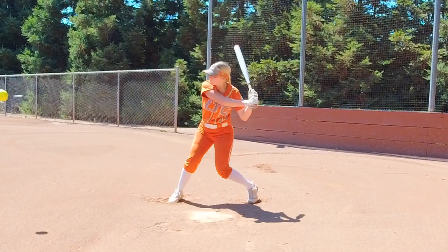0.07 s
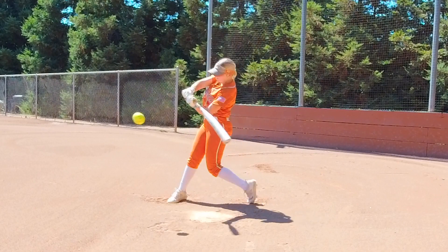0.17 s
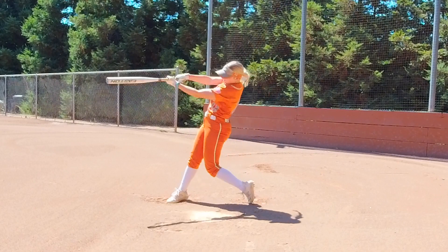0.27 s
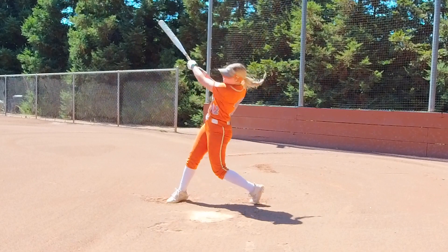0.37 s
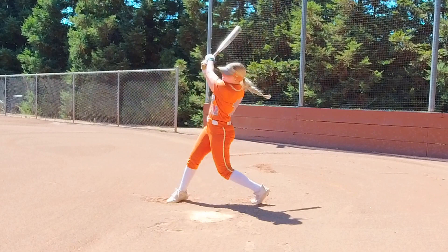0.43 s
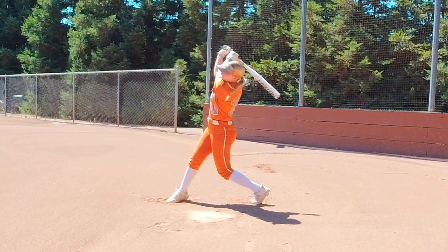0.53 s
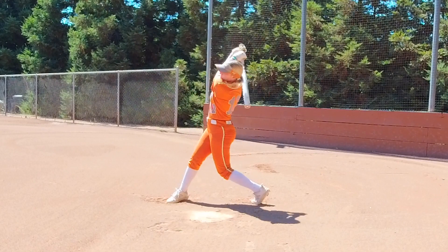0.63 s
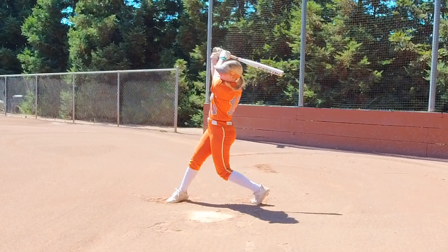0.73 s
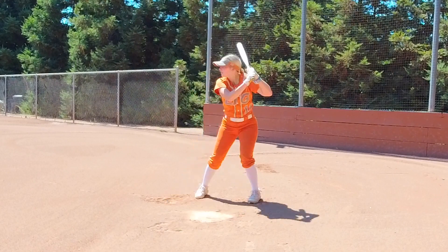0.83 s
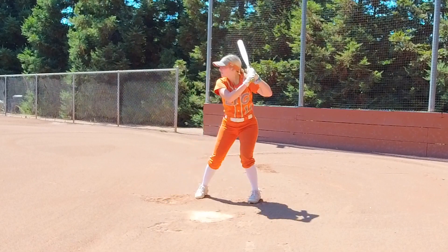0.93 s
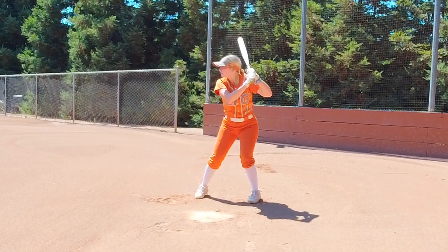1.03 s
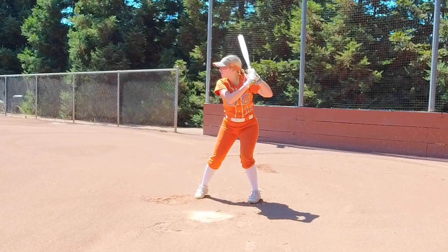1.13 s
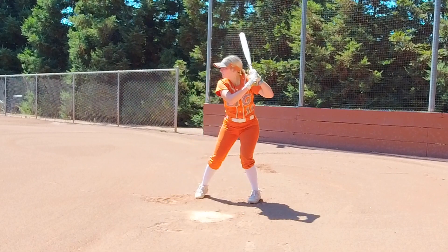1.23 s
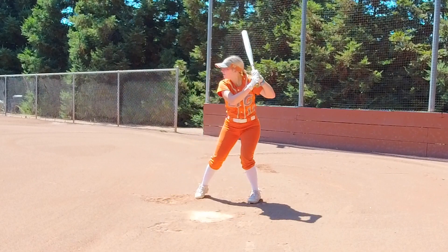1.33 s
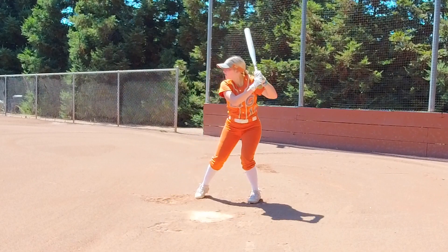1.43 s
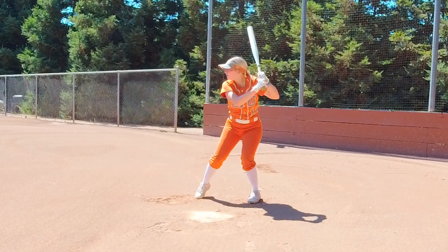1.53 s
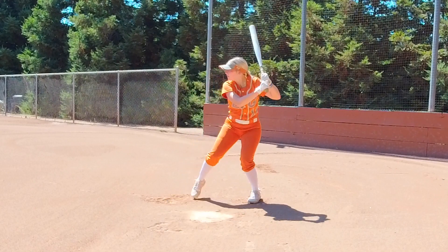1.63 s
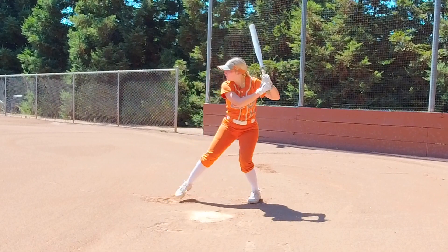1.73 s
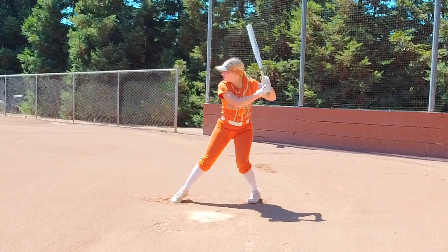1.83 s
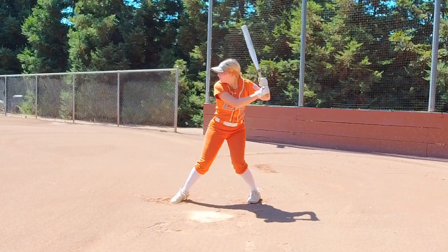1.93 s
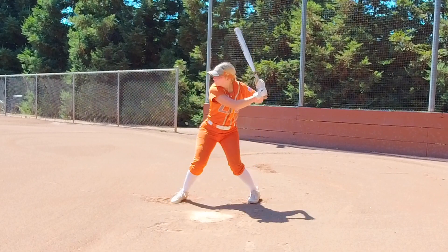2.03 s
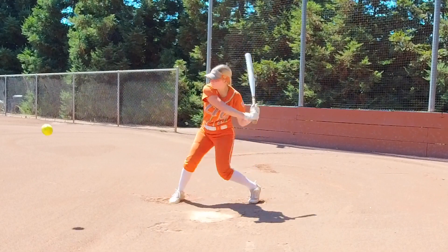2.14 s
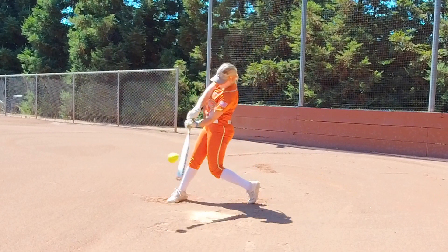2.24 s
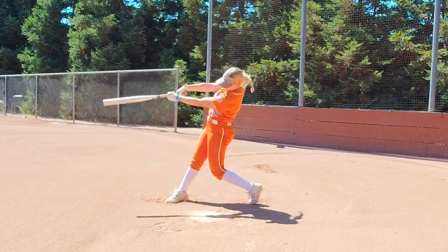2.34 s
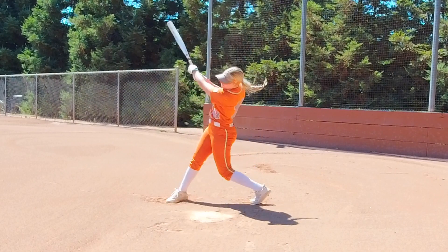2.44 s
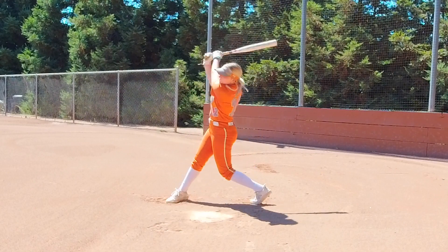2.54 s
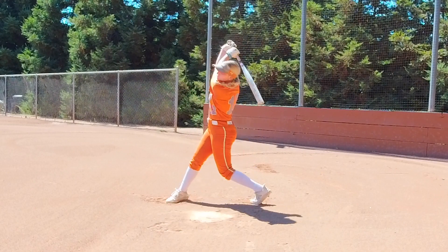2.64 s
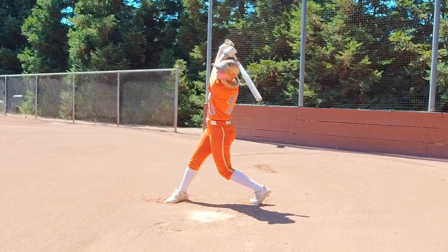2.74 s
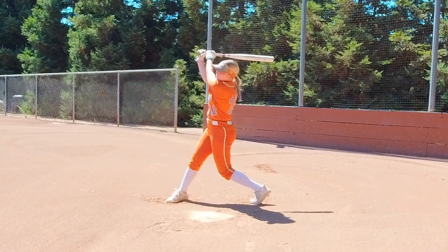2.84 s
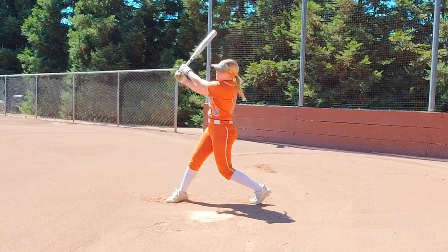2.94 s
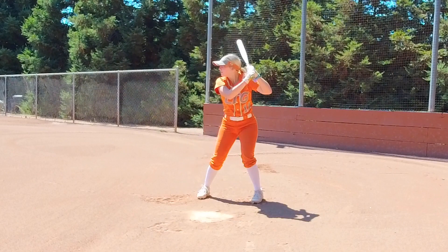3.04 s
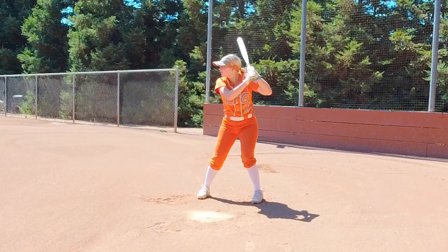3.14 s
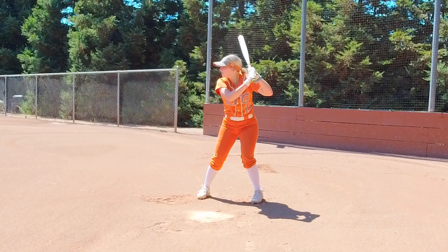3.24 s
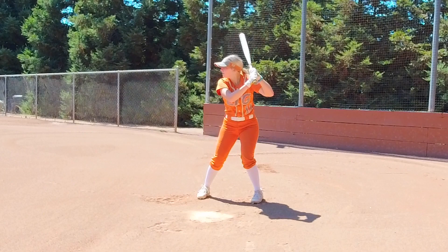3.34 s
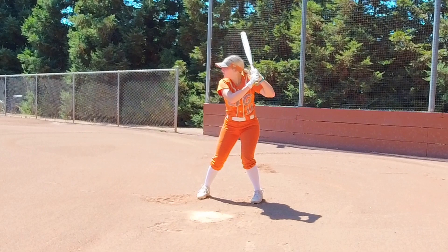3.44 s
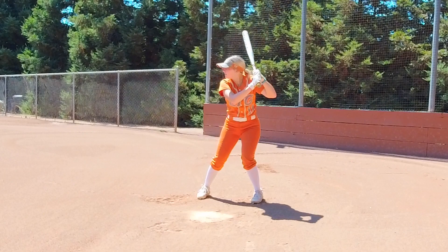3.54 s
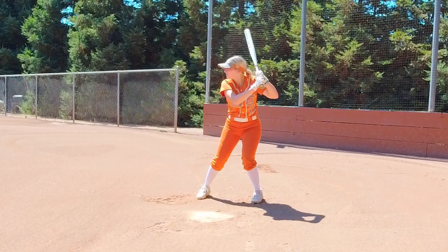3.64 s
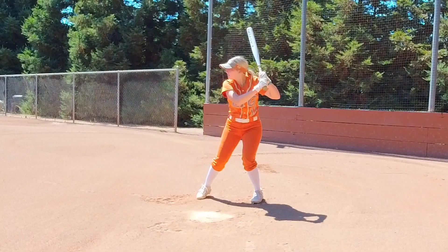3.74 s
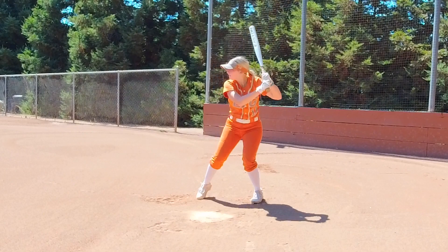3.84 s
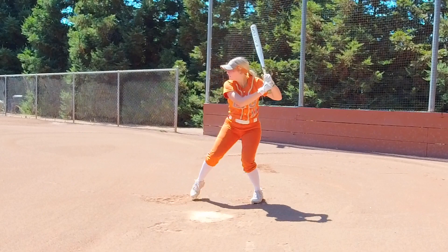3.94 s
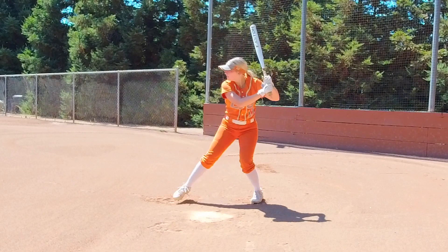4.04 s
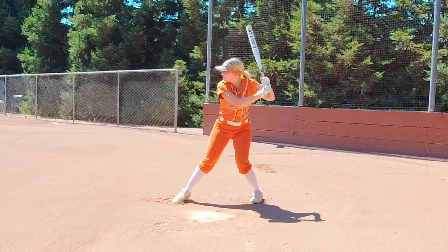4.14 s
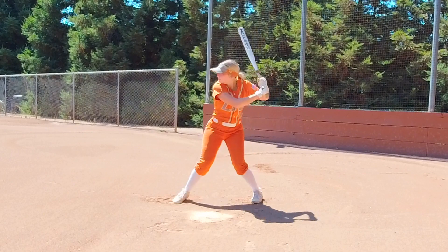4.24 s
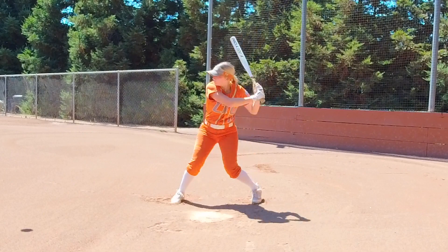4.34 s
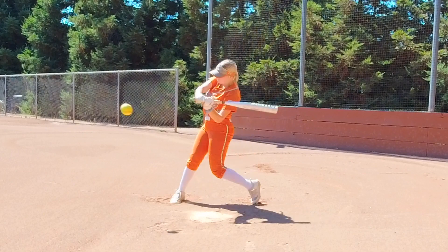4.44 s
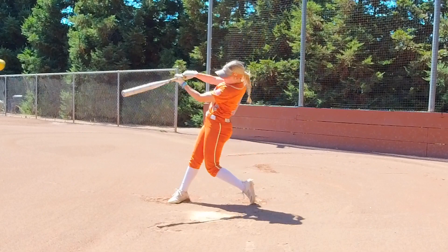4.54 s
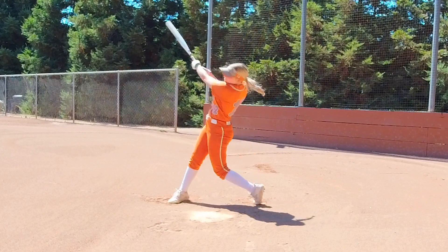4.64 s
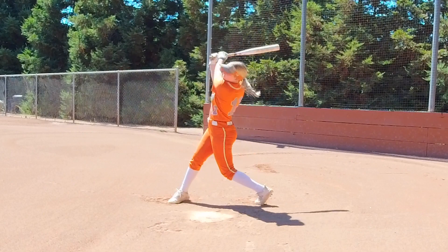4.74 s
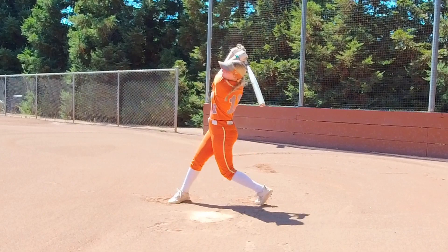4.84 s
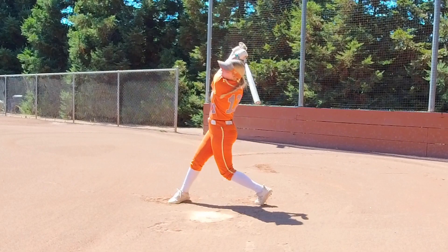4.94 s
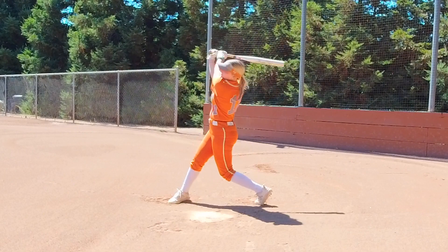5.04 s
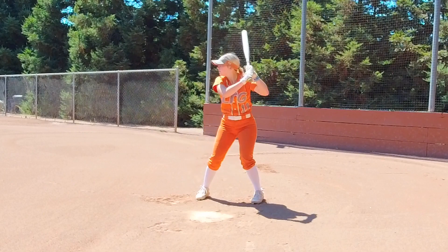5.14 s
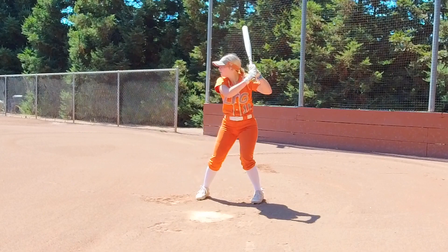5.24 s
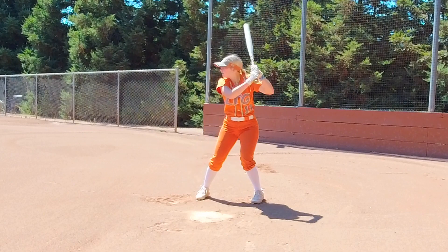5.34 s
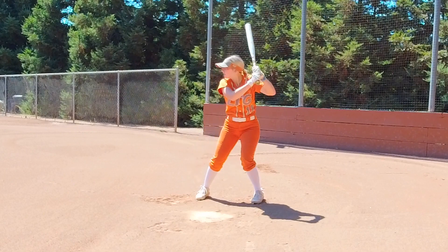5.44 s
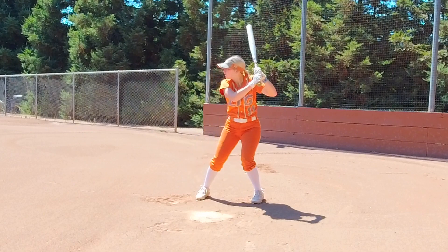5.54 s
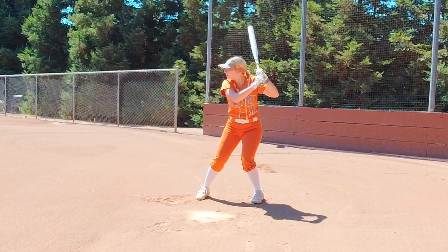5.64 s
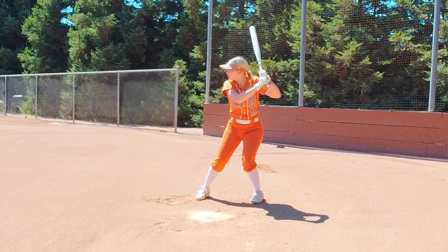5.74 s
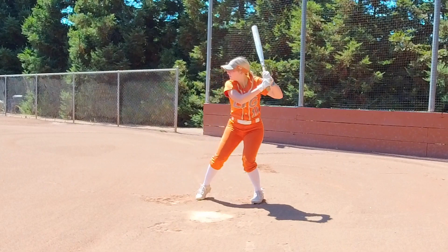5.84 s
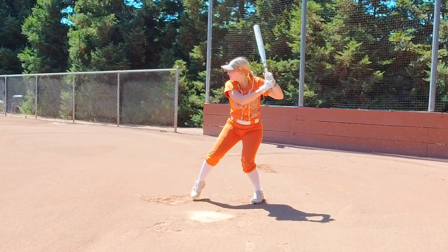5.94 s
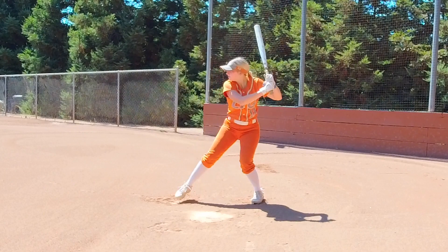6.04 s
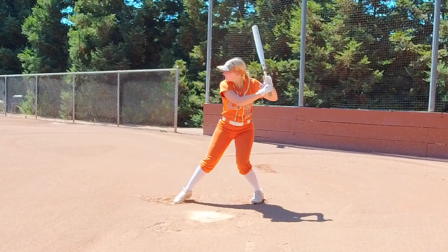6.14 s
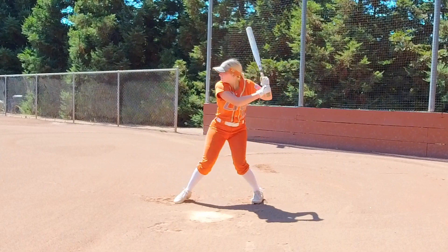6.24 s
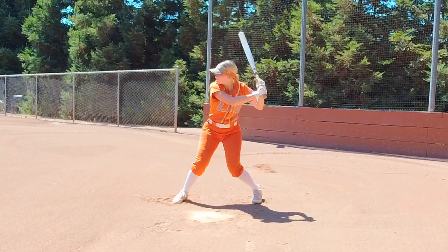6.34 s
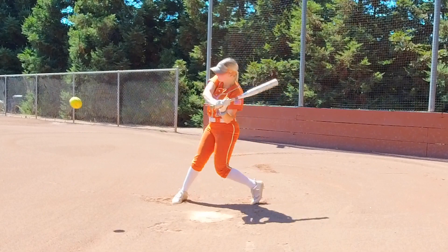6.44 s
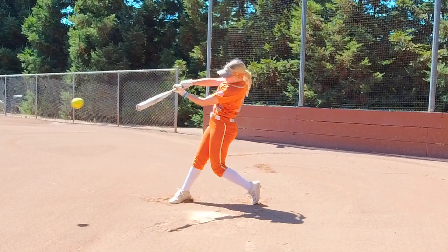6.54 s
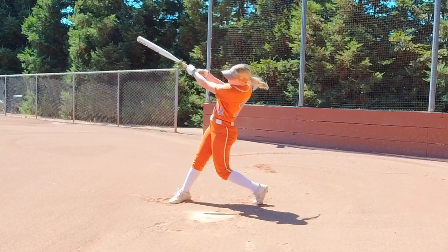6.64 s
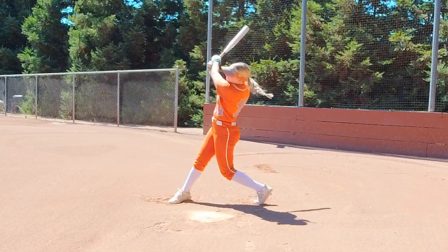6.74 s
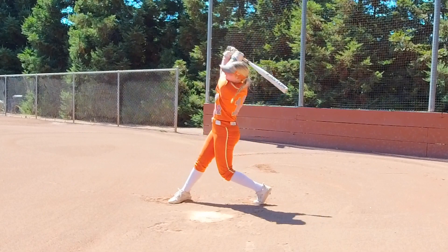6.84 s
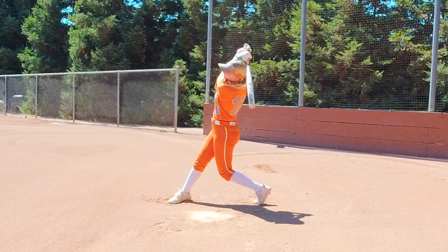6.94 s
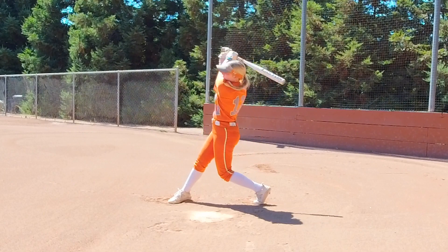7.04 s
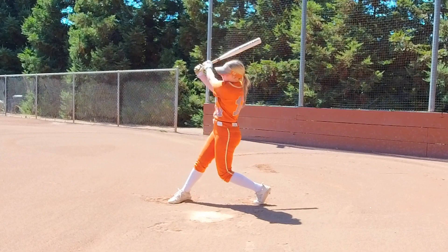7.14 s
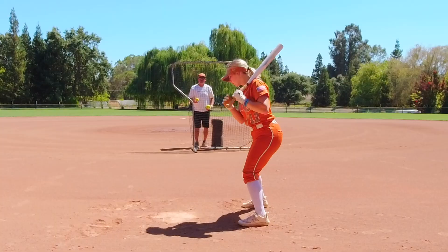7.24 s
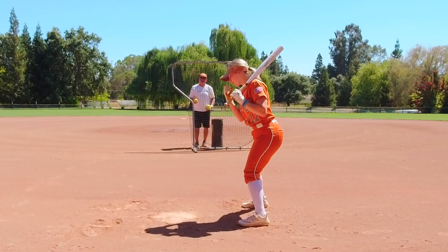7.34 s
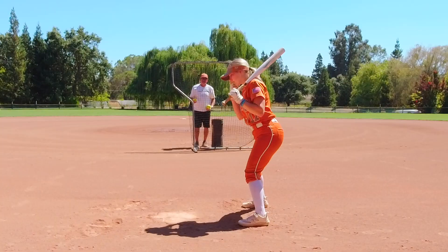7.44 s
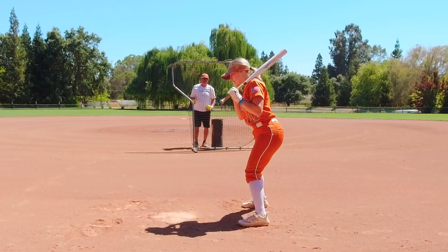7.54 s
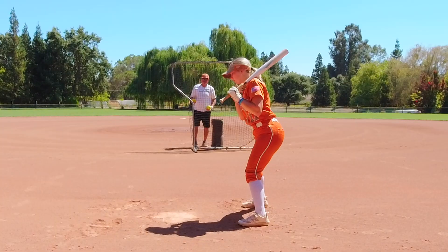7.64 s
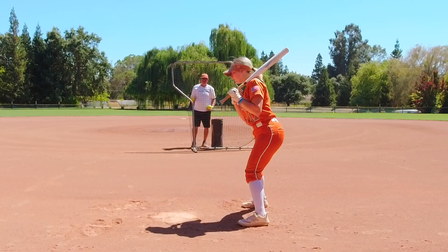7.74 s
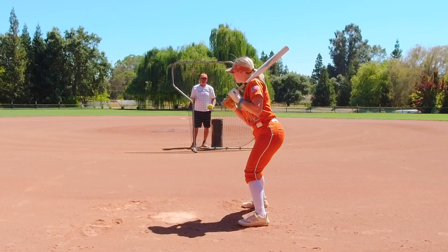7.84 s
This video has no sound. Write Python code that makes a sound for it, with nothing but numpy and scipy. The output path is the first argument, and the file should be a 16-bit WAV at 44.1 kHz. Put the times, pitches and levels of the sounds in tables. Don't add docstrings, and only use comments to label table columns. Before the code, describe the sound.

Outdoors on a dirt field, a small camera microphone picks up a very quiet bed of low engine drone, distant traffic, wind buffets and thin hiss. After a faint scuff, a bat cracks a softball at 0.2 s: a dry, hollow, clipped bang with a very short barrel ring, tight slaps from ground and wall, and a faint tail in the trees. The background dips, then creeps back; the scene cuts at 0.9 s. Gritty scuffs, heel knocks and a brief swish lead to the second crack at 2.3 s. After a cut near 3 s, pebbles tick and shoes dig before the third at 4.5 s. Another cut at 5.2 s, busier clicks and scuffs, then the fourth at 6.5 s. At 6.8 s the ball rattles a wire fence, links clinking and wires singing until 7.2 s. Wind and faint scuffs remain, with a slight footfall beginning at 7.9 s.

```python
import sys
import numpy as np
from scipy import signal
from scipy.fft import rfft, irfft, next_fast_len
from scipy.io import wavfile
from scipy.ndimage import uniform_filter1d

SR = 44100
rng = np.random.default_rng(int(sys.argv[2]) if len(sys.argv) > 2 else 0)


def natural_amplitude(level_db):
    exponent = np.asarray(level_db, float) / 20
    return 10 ** exponent


def unload_wav(signal):
    wavfile.write(
        sys.argv[1],
        SR,
        np.round(np.clip(np.atleast_2d(signal).T, -1, 1) * 32767).astype(np.int16),
    )


N = 348390
T = np.arange(N) / SR


def evened(x):
    return x / np.sqrt(np.mean(x ** 2) + 1e-20)


def read(points, hz):
    f, value = np.transpose(points)
    return np.interp(np.log(hz + 1), np.log(f + 1), value)


def add(mix, s, sound):
    part = mix[round(s * SR):][:len(sound)]
    part += sound[:len(part)]


def band(x, lo_hz, hi_hz, order=2):
    return signal.sosfilt(signal.butter(order, [lo_hz, min(hi_hz, SR / 2.1)], "band", fs=SR, output="sos"), x)


def noise_band(count, lo_hz, hi_hz, order=2):
    return evened(band(rng.standard_normal(count), lo_hz, hi_hz, order))


def coloured(x, points):
    size = next_fast_len(len(x))
    return irfft(rfft(x, size) * natural_amplitude(read(points, np.fft.rfftfreq(size, 1 / SR))), size)[:len(x)]


def fuzzy(hz, width_hz, count=N):
    r, turn = np.exp(-np.pi * width_hz / SR), 2 * np.pi * hz * T[:count]
    noise = rng.standard_normal((2, count + 4000))
    slow = signal.lfilter([1], np.convolve([1, -r], [1, -r]), noise)[:, 4000:]
    return evened(slow[0] * np.cos(turn) + slow[1] * np.sin(turn))


def ring(hz, db, t60, length=.4):
    t = T[:round(length * SR)]
    return natural_amplitude(db - 60 * t / t60) * np.sin(2 * np.pi * hz * t)


def grit(count, spread_db):
    grains = np.repeat(rng.exponential(1, count // 60 + 1), 60)[:count]
    lumps = uniform_filter1d(grains, 40)
    return rng.standard_normal(count) * natural_amplitude(spread_db * np.minimum(lumps, 4))


def patchy(x, depth_db, flash_db, bins=5, frames=7):
    z = signal.stft(x, SR, nperseg=256)[2]
    blots = uniform_filter1d(rng.standard_normal(z.shape), size=bins, axis=0)
    blots = evened(uniform_filter1d(blots, size=frames, axis=1))
    flash = evened(uniform_filter1d(rng.standard_normal(z.shape[1]), size=2))
    return signal.istft(z * natural_amplitude(depth_db * blots + flash_db * flash), SR, nperseg=256)[1][:len(x)]


# start in seconds, then levels in dB of whole barrel, crack, thud and field echo.
HITS = [
    (0.2115, 3.5, -5, -11.5, -1),
    (2.261, 6, -3, -19.5, -2.5),
    (4.5038, 5.5, -4.5, -22, -1),
    (6.5327, 5.5, -7.5, -11, -2),
]
# pitch in Hz, ring time (t60) in seconds, level in dB in hits 1, 2, 3 and 4.
BARREL_MODES = [(600, 0.013, -0.5, -6, -5.5, -2.5), (776, 0.0092, 1, -6, -1.5, -1),
                (1064, 0.032, -7, -8, -4.5, -9.5), (1183, 0.022, -19, -13.5, -16, -17),
                (1630, 0.0083, 3, 4, -2, 2.5), (1973, 0.012, -3.5, -8, -5.5, -7),
                (2124, 0.018, -7.5, -0.5, -11.5, -11.5), (2380, 0.017, -7.5, -13, -8, -17.5),
                (2603, 0.014, -8, -14.5, -8, -12.5), (3050, 0.015, -17.5, -15.5, -13.5, -10.5),
                (3500, 0.0083, -12, -12.5, -13.5, -9), (3980, 0.0081, -15, -10, -9.5, -14.5),
                (4425, 0.019, -18.5, -10, -14.5, -19), (4160, 0.013, -13, -8.5, -11.5, -16.5)]
# pitch in Hz, level in dB.
CRACK_COLOUR = [(1500, -4), (3000, -1), (4400, -0.5), (6200, -8), (8000, -2), (10500, -8), (12500, -10.5),
                (16000, -4.5)]
BOOM_DB = [-27.5, -23, -24, -40]


def strike(k, grip, aim_db=0):
    _, blow_db, crack_db, thud_db, _ = HITS[k]
    t, length = T[:4410], 4410 / SR
    levels_db = np.array(BARREL_MODES)[:, 2 + k] + aim_db
    barrel = np.zeros(len(t))
    for j, mode in enumerate(BARREL_MODES):
        hz, t60 = mode[:2]
        if t60 > .025:
            t60 = t60 * grip
        barrel += (-1) ** (j + 1) * ring(hz, levels_db[j], t60, length)
    barrel = barrel * (1 - np.exp(-t / 0.00014))
    dying = natural_amplitude(-60 * t / 0.014) + natural_amplitude(-15.0 - 60 * t / 0.057)
    crack = evened(coloured(rng.standard_normal(len(t)), CRACK_COLOUR)) * dying * (1 - np.exp(-t / .0003))
    thud = ring(170, thud_db, 0.018, length) + ring(170, thud_db - 3.5, 0.0026, length)
    boom = ring(65, BOOM_DB[k], 0.072, length)
    return natural_amplitude(blow_db) * barrel + natural_amplitude(crack_db) * crack + thud + boom


# delay in seconds, spread in seconds, pitch in Hz below which the echo is thin.
SLAPS = [
    (.0035, .003, 250),
    (.0078, .004, 1200),
    (.0138, .0022, 300),
    (.0246, .006, 600),
    (.0334, .0065, 600),
]
SCATTER = [(.09, .55), (.24, .6), (.38, -.55), (.57, -.45), (.73, .33), (.96, -.22)]


def slaps(sources, walls_db, trebles_db):
    split_hz, scatter_treble_db = 4532, -10.5
    out = np.zeros(len(sources[0]))
    share, strength = np.transpose(SCATTER)
    for x, (delay, spread, thin_hz), db, treble_db in zip(sources, SLAPS, walls_db, trebles_db):
        taps = np.zeros(600)
        taps[(share * spread * SR).astype(int)] = strength
        scattered = np.convolve(x, taps)[:len(x)]
        body = band(x + scattered, thin_hz, split_hz)
        edge = band(x + natural_amplitude(scatter_treble_db) * scattered, split_hz, 19000)
        add(out, delay, natural_amplitude(db) * (body - natural_amplitude(treble_db) * edge))
    return out


# pitch in Hz, fading time (t60) in seconds.
FIELD_T60 = [(100, 0.11), (500, 0.45), (800, .3), (1100, .25), (2500, 0.42), (5000, 0.35), (9000, 0.32),
             (15500, 0.27)]
# pitch in Hz, level in dB.
FIELD_COLOUR = [(100, -9.5), (400, -9.5), (640, -4.5), (850, -11), (1100, 3.5), (1600, -6.5), (2200, -5),
                (3000, -7.5), (4100, -6), (5000, -12), (9000, -12), (16000, -15.5)]
# delay in seconds, level in dB, smear in seconds.
FAR_ECHOES = [(.19, -56, 0.053), (0.333, -55.5, 0.069), (.46, -65.5, 0.033), (.6, -86, 0.011)]
# pitch in Hz, level in dB.
FAR_COLOUR = [(250, -41), (560, -10.5), (800, -18), (1100, -9.5), (1500, -16), (2200, -11), (3000, -13.5),
              (4200, -12), (5600, -19.5), (8000, -30), (14000, -50)]


def field():
    patchy_db, posts_db = 2.6, .9
    t = T[:SR]
    noise = coloured(rng.standard_normal(SR), FIELD_COLOUR)
    hz, frames, z = signal.stft(evened(patchy(noise, patchy_db, posts_db)), SR, nperseg=256)
    near = signal.istft(z * natural_amplitude(-60 * frames / read(FIELD_T60, hz)[:, None]), SR, nperseg=256)[1][:SR]
    ping = fuzzy(1095, 150, count=SR) + natural_amplitude(-13) * fuzzy(2050, 260, count=SR)
    near = natural_amplitude(-25.5) * near + natural_amplitude(-27 - 60 * t / 0.28) * ping
    near = near * np.clip((t - .012) / 0.064, 0, 1)

    far = natural_amplitude(-62.0 - 6.5 * t)
    for s, db, smear in FAR_ECHOES:
        rise = np.clip((t - s) / 0.0096 + 1, 0, 1)
        far = far + natural_amplitude(db) * np.exp(-np.maximum(t - s, 0) / smear) * rise
    wash = coloured(grit(SR, spread_db=.8), FAR_COLOUR)
    wash = evened(patchy(wash, patchy_db, posts_db / 2, bins=2, frames=24))
    wash = wash + (natural_amplitude(8.5 - 52 * t) - 1) * band(wash, 2200, 10000)
    wash = wash + natural_amplitude(-11.5 - 9 * t) * fuzzy(4200, 350, count=SR) + natural_amplitude(-6.5) * ping
    return near + far * wash * np.clip(t / .08, 0, 1)


CUTS = [.87, 3.03, 5.18, 7.215]
WALL_DB = [(-19.5, -22.5, -20.5, -21, -11.5), (-20.5, -25.5, -20, -19, -12), (-14, -23, -21, -18, -10),
           (-19.5, -23.5, -16.5, -12.5, -13.5)]
SLAP_TREBLE_DB = [(0, -5.5, -6, 6, 1), (0, -7.5, -5, 2, 1.5), (0, -6.5, -7, 11, 4.5),
                  (0, -6, -11.5, 2.4, 1.5)]
DOWNWARD_DB = [(2, -1.5, -3.5, -3.5, -3.5, 1, 2.5, 1.5, 0, -4.5, -4.5, -4, -3.5, -4.5),
               (8.5, 6, 2.5, 3, -5, -6.5, -7, -5.5, -3, -3, -1.5, -4.5, -4, -2),
               (-2, -4, -1.5, 4, 1, 3, 4, 3, 2, -3.5, -4.5, -2.5, -5.5, -3.5),
               (-4, -8, 6, -4.5, -3.5, -3, 4, 4, -3.5, -4, -6, -8, -2.5, -5.5)]
SIDEWAYS_DB = [(-12.5, -13, 8, 3, -12.5, -6, -6, 1, -1.5, -4.5, -7.5, -9, -5.5, -6.5),
               (-2, -9, 2.5, 3, -16.5, -13.5, -13.5, -7.5, -7.5, 1, 1.5, -3.5, -7.5, -5),
               (-9, -12, 1.5, 1.5, -14.5, -4, -5.5, -2, -2.5, -1.5, -5, -8, -9.5, -7.5),
               (-4.5, -17, 6.2, 3.1, -19.5, -9, -5, 6.5, 2.5, -5, -8.5, -12.5, -7.5, -3.5)]
GRIP = [(.95, .9), (.7, .5), (.9, .6), (.75, 1.05)]


def hits():
    out = np.zeros(N)
    for k, cut in enumerate(CUTS):
        s, field_db = HITS[k][0], HITS[k][4]
        front_grip, side_grip = GRIP[k]
        front = strike(k, front_grip)
        low = strike(k, front_grip, DOWNWARD_DB[k])
        flank = strike(k, side_grip, SIDEWAYS_DB[k])
        sound = natural_amplitude(field_db) * field()
        echoes = slaps([front, front, low, flank, flank], WALL_DB[k], SLAP_TREBLE_DB[k])
        add(sound, 0, front + echoes)
        add(out, s, sound[:round((cut - s) * SR)])
    return out


def late_return():
    out = np.zeros(N)
    add(out, .805, noise_band(4410, 900, 2500) * natural_amplitude(-60 - 60 * T[:4410] / .14))
    return out


# pitch in Hz, level in dB.
DIRT_COLOUR = [(300, -31.5), (550, -5), (1000, 0.5), (1700, -0.5), (2800, -10), (4500, -25.5),
               (9000, -46.5)]


def grind(count, hollow_db):
    dirt = patchy(grit(count, spread_db=1.7), 2.1, 1.1)
    body = evened(coloured(dirt, DIRT_COLOUR))
    hollow = band(body, 300, 500) + natural_amplitude(-4.0) * evened(band(dirt, 470, 660))
    edge = natural_amplitude(-13) * evened(band(dirt, 1700, 5300))
    dust = natural_amplitude(-24.5) * evened(band(dirt, 4500, 10000, order=1))
    return band(body, 950, 16000) + edge + dust - natural_amplitude(hollow_db) * hollow


# levels in dB of swish, low rush, hollow band and deep push.
SWINGS = [
    (-49, -49, -14.5, -55.5),
    (-43.5, -44, 3.5, -39.5),
    (-48.5, -50.5, 3.5, -56.5),
    (-44.5, -52, -3, -55.5),
]
SURGE_DB = [-38, -36.5, -34, -39.5]


def swings():
    swing_db_per_s, surge_db_per_s = 245.5, 3499.5
    out, t = np.zeros(N), T[:8000] - T[8000]
    for hit, (db, rush_db, hollow_db, deep_db), surge_db in zip(HITS, SWINGS, SURGE_DB):
        rush = natural_amplitude(rush_db) * noise_band(8000, 230, 370) + natural_amplitude(deep_db) * noise_band(8000, 45, 150)
        swell = natural_amplitude(swing_db_per_s * np.minimum(t + 0.013, 0))
        add(out, hit[0] + t[0], (natural_amplitude(db) * grind(8000, hollow_db) + rush) * swell)
        surge = noise_band(8000, 1500, 9000, order=1)
        add(out, hit[0] + t[0], surge * natural_amplitude(surge_db + surge_db_per_s * t))
    return out


# time in seconds, rattle level in dB, treble level in dB.
FENCE = [(6.78, -46, -14), (6.783, -26, -16), (6.787, -27.5, -6.5), (6.801, -23, 1), (6.807, -31.5, -6),
         (6.832, -28.5, 0.5), (6.845, -35, -3), (6.897, -35, -4), (6.915, -42.5, -1.5), (7.001, -47, -2),
         (7.082, -60.5, -1), (7.168, -62, -17), (7.178, -46.5, -25), (7.218, -64, -5.5)]
# pitch in Hz, level in dB.
FENCE_COLOUR = [(35, -36.5), (60, -6), (281, -9), (408, -16), (527, -2.5), (1140, -3.5), (4320, -4.5),
                (6140, -20.5), (6580, -14), (13000, -30), (16000, -22.5)]


def fence_rattle():
    out = np.zeros(N)
    s, *columns = np.transpose(FENCE)
    t = np.arange(s[0], s[-1], 1 / SR)
    db, treble_db = (np.interp(t, s, column) for column in columns)
    links = coloured(patchy(grit(len(t), spread_db=1.3), 1.1, 0.96), FENCE_COLOUR)
    bright = band(links, 6700, 23000)
    rattle = evened(links - bright) + natural_amplitude(treble_db) * evened(bright)
    add(out, s[0], natural_amplitude(db - 4.5) * rattle)
    return out


# pitch in Hz, level in dB, ring time (t60) in seconds.
WIRES = [(6545, -42.5, 0.72), (2391, -49, 0.81), (1100, -44, 0.51), (8240, -53, 0.6)]


def fence_wires():
    out = np.zeros(N)
    start, end = FENCE[0][0], FENCE[-1][0]
    t = np.arange(start, end, 1 / SR)
    shimmer = 1 + 0.32 * noise_band(len(t), 13, 90, order=1)
    wires = np.zeros(len(t))
    for hz, db, t60 in WIRES:
        tone = np.sin(2 * np.pi * hz * t) + 0.56 * fuzzy(hz, hz / 120, count=len(t))
        wires += natural_amplitude(db - 60 * (t - start) / t60) * tone
    add(out, start, wires * shimmer)
    return out


# start in seconds, pitch in Hz, level in dB, ring time (t60) in seconds.
CLINKS = [(6.935, 8400, -47, 0.05), (7.036, 12600, -59, 0.22), (7.04, 12540, -63, 0.2),
          (6.825, 12550, -49, .12), (6.89, 12400, -50, .08), (6.93, 12600, -54, .1),
          (6.952, 9600, -50, .02), (6.935, 11400, -52, .02), (6.82, 8200, -44, .03)]
# start in seconds, level in dB, fading time (t60) in seconds.
SNAPS = [
    (6.7811, -29, 0.03),
    (7.1771, -40, 0.025),
    (7.18, -58, 0.19),
]


def fence_links():
    out = np.zeros(N)
    for s, hz, db, t60 in CLINKS:
        add(out, s, ring(hz, db, t60, 0.16))
    t = T[:4410]
    from_hz, to_hz, glide_s = 3750, 4260, .0022
    turns = np.cumsum(to_hz + (from_hz - to_hz) * np.exp(-t / glide_s)) / SR
    add(out, 6.933, natural_amplitude(-40 - 60 * t / .06) * np.sin(2 * np.pi * turns))
    for s, db, t60 in SNAPS:
        add(out, s, noise_band(1550, 1740, 16000, order=1) * natural_amplitude(db - 60 * T[:1550] / t60))
    return out


# peak in seconds, dig in seconds, level in dB, settling time (t60) in seconds, hollow in dB.
SCUFFS = [(.005, 0.0066, -48, 0.38, -1), (.1, 0.023, -56, 3.9, 3), (1.846, 0.0067, -58, 0.14, -9),
          (1.882, 0.015, -47, 0.14, -8), (1.98, 0.045, -64.5, 1.3, -1), (2.108, 0.064, -44, 0.33, 2.5),
          (2.169, 0.0063, -50, 0.15, 12.5), (2.219, 0.0053, -55, 1.1, 9), (3.59, 0.031, -56.5, 0.096, -2),
          (3.62, .02, -65.5, 1.5, 0.5), (3.816, 0.019, -60.5, 0.47, -2), (3.915, 0.013, -68, 0.29, -5),
          (4.15, 0.0093, -46, 0.12, -18), (4.18, 0.029, -58, 1.4, -5.5), (4.333, 0.043, -45.5, 0.48, 3),
          (4.41, 0.035, -59, 0.86, 4.5), (5.775, 0.025, -62.5, 0.91, -6), (6.118, 0.0031, -50, 0.15, 2),
          (6.157, 0.028, -46, 0.21, -4.5), (6.255, 0.025, -56, 0.9, 1), (6.34, 0.064, -46.5, 0.59, 2.5),
          (6.41, 0.033, -45.5, 3.6, 0.5), (7.228, 0.0099, -63, 0.31, 1), (7.43, .12, -67.5, 1.24, -9.5),
          (7.63, 0.052, -69.5, 2.8, -5)]


def scuffs():
    rise_db = 26
    out, t = np.zeros(N), T[:17000]
    for s, dig, db, t60, hollow_db in SCUFFS:
        dig = np.clip(dig, .002, s)
        digging = rise_db * (t / dig - 1)
        settling = -60 * (t - dig) / t60 - 600 * t ** 3
        shape_db = np.where(t < dig, digging, settling)
        add(out, s - dig, natural_amplitude(db + shape_db) * grind(len(t), hollow_db))
    return out


# start in seconds, level in dB.
KNOCKS = [(2.106, -42), (2.113, -39), (2.143, -43), (2.1675, -37), (2.194, -41), (4.342, -42), (4.365, -47),
          (6.117, -45)]
# start in seconds, level in dB.
THUMPS = [
    (1.841, -55),
    (1.881, -49.5),
    (4.328, -51),
    (6.343, -57),
]


def footfalls():
    out, t = np.zeros(N), T[:4410]
    for s, db in KNOCKS:
        knock = ring(575 * rng.uniform(.97, 1.03), db + 2, .045, .1)
        add(out, s, knock * (1 - np.exp(-t / .002)))
    for s, db in THUMPS:
        add(out, s, noise_band(4410, 125, 400) * natural_amplitude(db - 60 * t / 0.29))
    add(out, 7.893, natural_amplitude(-57) * noise_band(700, 343, 1930))
    return out


# start in seconds, peak in dB, middle pitch in Hz, fading time (t60) in seconds.
TICKS = [(0.4987, -48.5, 2280, 0.021), (0.67, -55, 1645, 0.036), (0.95, -57, 4145, 0.061),
         (1.8442, -59, 1572, 0.037), (1.879, -46, 1686, 0.026), (2.168, -44, 1763, 0.058),
         (2.2184, -39.5, 1580, 0.025), (2.604, -55, 2160, 0.028), (3.2241, -44.5, 2200, 0.045),
         (3.414, -48, 1387, 0.043), (3.4893, -47.5, 1637, 0.06), (3.5875, -48.5, 2020, 0.034),
         (3.819, -47.5, 2160, 0.036), (4.1069, -46, 1530, 0.053), (4.15, -34, 1554, 0.01),
         (4.3325, -45.5, 1830, 0.024), (4.4097, -37, 1660, 0.04), (5.478, -49, 1607, 0.04),
         (5.663, -46, 1872, 0.025), (5.754, -42, 1657, 0.027), (5.7729, -35, 1685, 0.029),
         (6.1163, -44, 1630, 0.022), (6.1583, -32, 1664, 0.03), (6.3046, -56.5, 2540, 0.042),
         (6.33, -26.5, 1563, 0.027), (6.399, -34.5, 1670, 0.074), (6.4235, -29.5, 1660, 0.031),
         (7.894, -55.5, 3800, 0.027)]


def stones():
    out = np.zeros(N)
    for s, db, hz, t60 in TICKS:
        stone = noise_band(3000, hz * .7, hz * 2.4, order=3)
        add(out, s, stone * natural_amplitude(db - 13.0 - 60 * T[:3000] / t60))
    return out


# start in seconds, peak in dB, middle pitch in Hz.
CLICKS = [(.951, -61, 4960), (1.8443, -46.5, 4200), (1.8782, -51, 2500), (2.0795, -47, 2000),
          (2.165, -47.5, 1500), (2.2175, -35, 1610), (3.225, -63, 6000), (3.598, -55.5, 2500),
          (3.638, -56, 3200), (3.666, -56, 2594), (3.737, -56, 1900), (3.845, -60, 2400),
          (3.916, -53, 1804), (4.144, -45.5, 2966), (4.1476, -40, 2800), (4.157, -50, 3110),
          (4.1667, -47, 3740), (4.218, -50, 2300), (4.311, -49.5, 2980), (4.3324, -32, 2340),
          (4.4093, -51, 5485), (5.7538, -51, 4910), (5.7727, -43.5, 4400), (5.765, -54.5, 5500),
          (5.784, -57, 3500), (5.793, -54, 3500), (5.797, -51.5, 2500), (5.803, -50.5, 2190),
          (5.815, -57, 4040), (5.825, -57, 3500), (5.84, -63, 3970), (5.857, -57, 3500), (5.871, -56, 3500),
          (6.119, -42, 1493), (6.118, -53.5, 6100), (6.142, -60, 5050), (6.1537, -50, 2990),
          (6.3065, -39, 1920), (6.3308, -53.5, 3500), (6.374, -61, 6430), (6.4046, -45, 3500),
          (6.423, -30, 2950), (6.452, -45, 3500), (6.475, -54, 4000), (6.49, -43, 3500)]


def clicks():
    out = np.zeros(N)
    for s, db, hz in CLICKS:
        add(out, s, noise_band(1000, hz / 2, hz * 1.5, order=3) * natural_amplitude(db - 60 * T[:1000] / .009))
    return out


def glove_creak():
    out, count = np.zeros(N), round(.2 * SR)
    add(out, 3.62, natural_amplitude(-70) * fuzzy(1700, 130, count=count) * signal.windows.tukey(count, .3))
    return out


def ducking(depths_db, creep_db_per_s):
    db = np.zeros(N)
    for hit, cut, depth_db in zip(HITS, CUTS, depths_db):
        ducked = (T > hit[0]) & (T < cut)
        db -= ducked * np.maximum(depth_db - creep_db_per_s * (T - hit[0]), 0)
    return natural_amplitude(uniform_filter1d(db, 300))


# engine in dB, overtones in dB, their drift in dB/s, traffic in dB, wind in dB.
TAKES = [
    (-58, -6.5, -0.5, -60.5, -78.5),
    (-61, -0.5, 1, -61, -69),
    (-57, 1, 3.5, -61.5, -70),
    (-55.5, 1, -3, -63, -77),
    (-61.5, -19, 0.5, -78, -67),
]
# engine in dB, overtones in dB, traffic in dB.
DUCK = [(5, 3, 6.5), (6, 14.5, 10.5), (7, 11.5, 9), (7, 9.5, 4.5)]


def background_levels():
    take = np.searchsorted(CUTS, T)
    engine_db, over_db, drift, traffic_db, wind_db = np.transpose(TAKES)[:, take]
    over_db = over_db + drift * (T - np.append(0, CUTS)[take])
    low, high, far = (ducking(depths_db, 3) for depths_db in np.transpose(DUCK))
    return natural_amplitude(engine_db) * low, natural_amplitude(over_db) * high, natural_amplitude(traffic_db) * far, natural_amplitude(wind_db) * low


# pitch in Hz, width in Hz, level in dB.
OVERTONES = [(253, 0.91, -62.5), (333, 8.4, -70.5), (414, 12, -76), (180, 1.7, -79), (306, 3.3, -77)]


def engine(level, over_level):
    ease = np.clip((T - 4.5) / 1, 0, 1)
    turns = np.cumsum(1 - 0.032 * ease) / SR
    hum = evened(fuzzy(88, 15.0) + 0.49 * fuzzy(77, 14.) + 0.94 * np.sin(2 * np.pi * 84 * turns))
    overtones = np.zeros(N)
    for hz, width_hz, db in OVERTONES:
        overtones += natural_amplitude(db) * (np.sin(2 * np.pi * hz * turns) + 0.06 * fuzzy(hz, width_hz))
    return natural_amplitude(5.0) * level * hum + over_level * overtones


# middle in seconds, length in seconds,
# level in dB.
GUSTS = [(0.875, 0.077, -60), (1.95, 0.3, -61), (2.15, 0.16, -79), (2.501, 0.35, -56), (2.902, 0.46, -57),
         (3.856, 0.32, -71), (4.401, 0.2, -74.5), (5.188, 0.16, -66.5), (6.852, 0.12, -65),
         (7.47, 0.19, -52.5), (7.763, 0.28, -53)]


def wind(level):
    lumps = natural_amplitude(12.0 * np.tanh(noise_band(N, 2.0, 21, order=1)))
    rumble = evened(band(rng.standard_normal(N) * lumps, 37, 61, order=3))
    buffets = evened(band(rng.standard_normal(N) * lumps, 85, 190))
    for s, length, db in GUSTS:
        level = level + natural_amplitude(db) * np.exp(-8 * ((T - s) / length) ** 2)
    return level * (1.5 * rumble + 0.47 * buffets)


def traffic(level):
    return natural_amplitude(-6.5) * level * noise_band(N, 150, 470)


# pitch in Hz, level in dB.
AIR_COLOUR = [(59, -31), (100, 2.5), (186, -14.5), (256, -20.5), (455, -27.5), (775, -25.5), (1040, -24),
              (1210, -27.5), (6260, -35), (10800, -39.5), (11900, -43.5), (12900, -38), (15500, -43),
              (16400, -67)]


def air():
    hz = np.fft.rfftfreq(512, 1 / SR)
    a, b, patches = rng.standard_normal((N // 128 + 5, 257, 3)).T
    patches = evened(uniform_filter1d(uniform_filter1d(patches, 8, 0), 30, 1))
    z = (a + 1j * b) * natural_amplitude(read(AIR_COLOUR, hz)[:, None] + 1.1 * patches)
    hiss = evened(signal.istft(z, nperseg=512, noverlap=384)[1][:N])
    return natural_amplitude(-63) * hiss * ducking([4.6, 7.1, 8.2, 3.6], 2.2)


def whine():
    return natural_amplitude(-88) * fuzzy(12800, 2200) * ducking([8., 8., 8., 7.85], 3.)


# pitch in Hz, side level against the middle in dB.
WIDTH = [(60, -39), (120, -36), (240, -38), (480, -49), (950, -42), (1890, -30.5), (3770, -11.5),
         (7520, -2), (15000, -3)]


def scene():
    cracks = hits()
    engine_level, over_level, traffic_level, wind_level = background_levels()
    rest = late_return() + swings() + fence_rattle() + fence_wires() + fence_links()
    rest = rest + scuffs() + footfalls() + stones() + clicks() + glove_creak()
    rest = rest + engine(engine_level, over_level) + wind(wind_level) + traffic(traffic_level)
    rest = rest + air() + whine()
    hz, _, z = signal.stft(rest + natural_amplitude(-2.2) * cracks, SR, nperseg=128)
    random_turn = np.exp(2j * np.pi * rng.random(z.shape[::-1]).T)
    z = z * natural_amplitude(read(WIDTH, hz)[:, None] - 0.5) * random_turn
    side = signal.istft(z, SR, nperseg=128)[1][:N]
    return cracks + rest + np.array([side, -side])


def band_limit(x):
    return signal.sosfilt(signal.butter(12, 16500, fs=SR, output="sos"), x)


def record(dry):
    ceiling = .975
    left, right = np.clip(dry, -ceiling, ceiling)
    side = band(left - right, 900, 20000, order=1) / 2 + natural_amplitude(-14) * (left - right)
    both = (left + right) / 2 + np.array([side, -side])
    cut = signal.sosfilt(signal.butter(2, 45, "high", fs=SR, output="sos"), both)
    treble_cut = signal.firwin(255, 15760, window=("kaiser", 9), fs=SR)[None]
    return band_limit(signal.oaconvolve(cut, treble_cut, "same"))


dry = scene()
out = record(dry)
unload_wav(out)
```